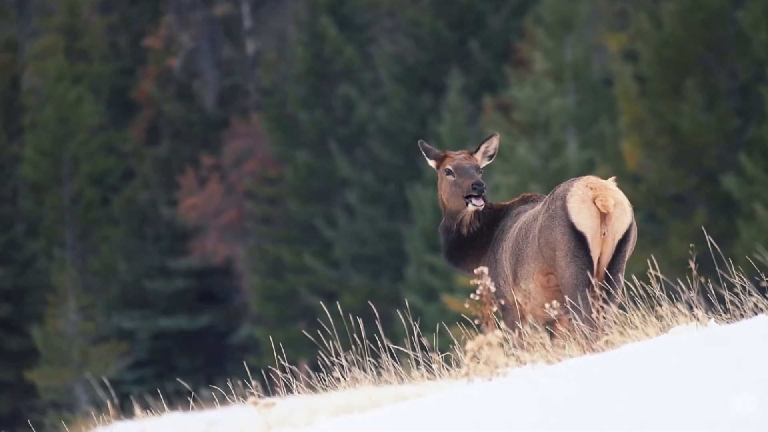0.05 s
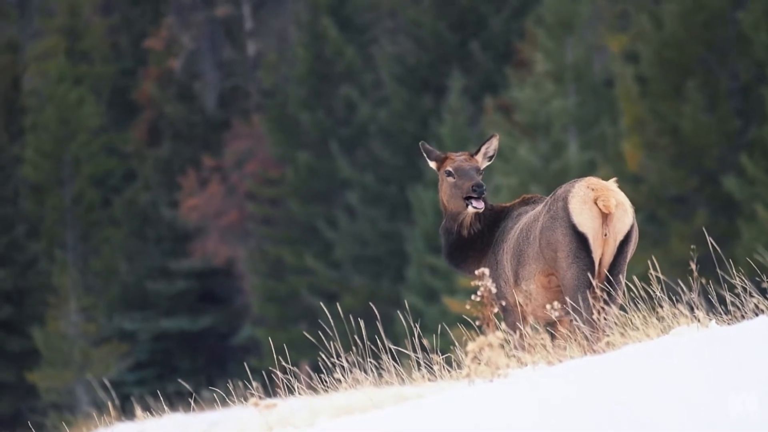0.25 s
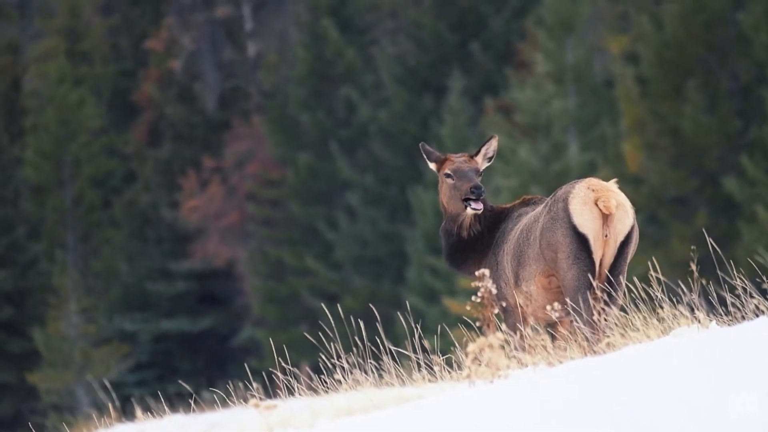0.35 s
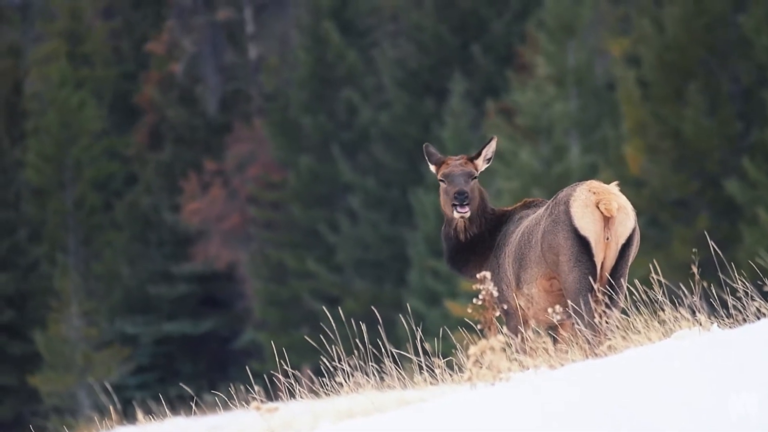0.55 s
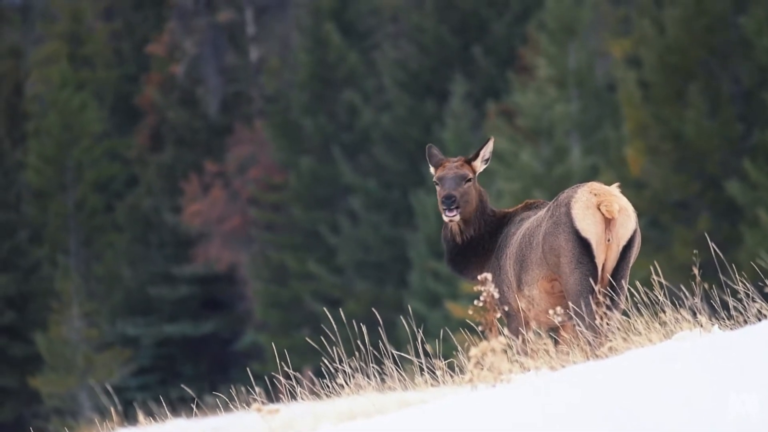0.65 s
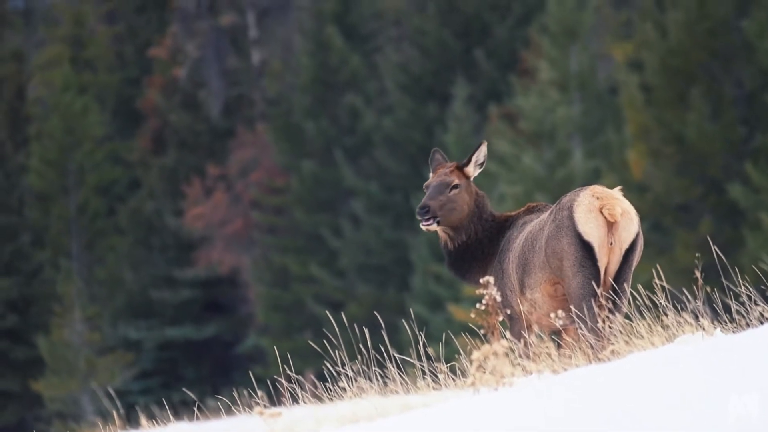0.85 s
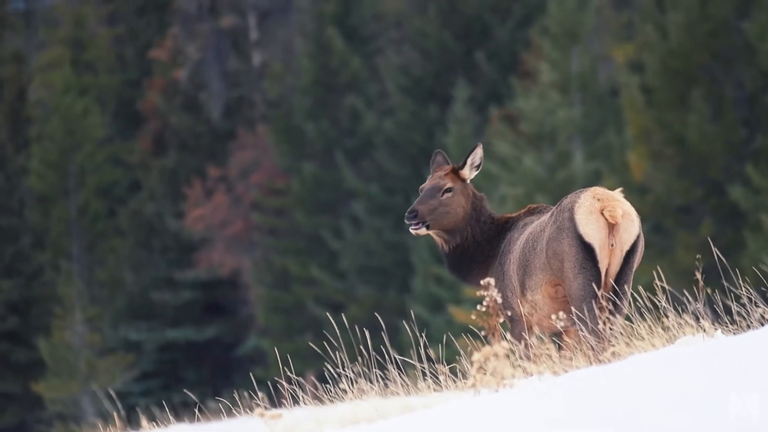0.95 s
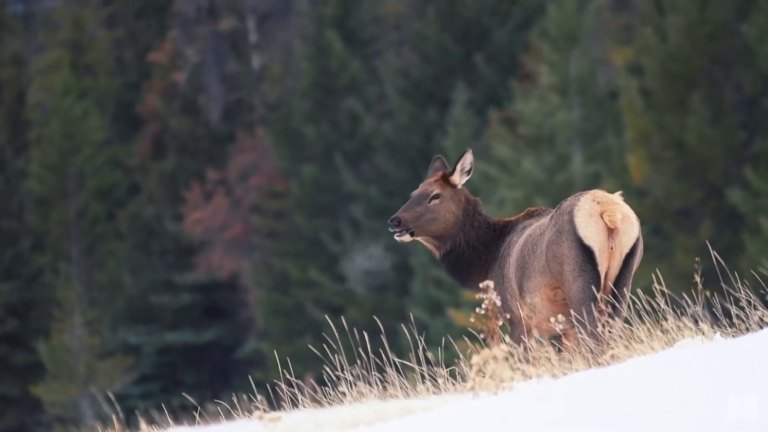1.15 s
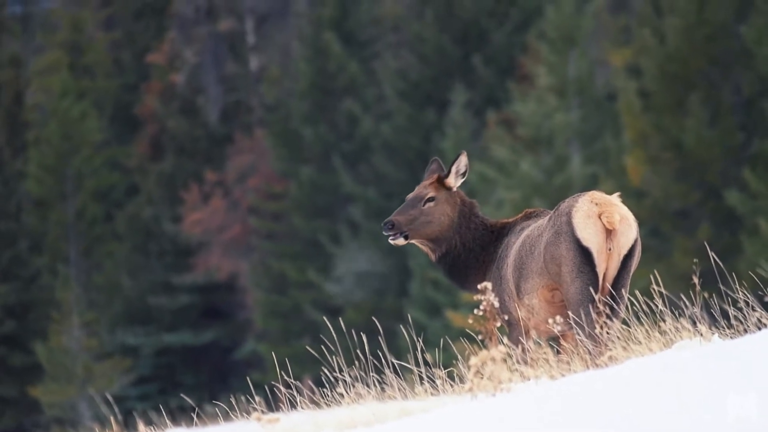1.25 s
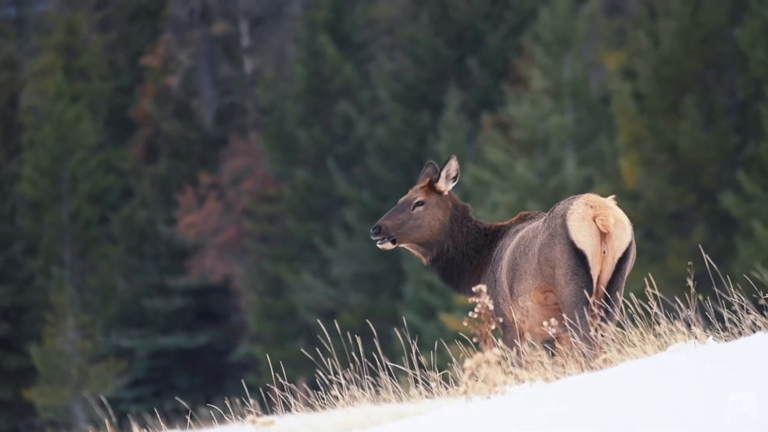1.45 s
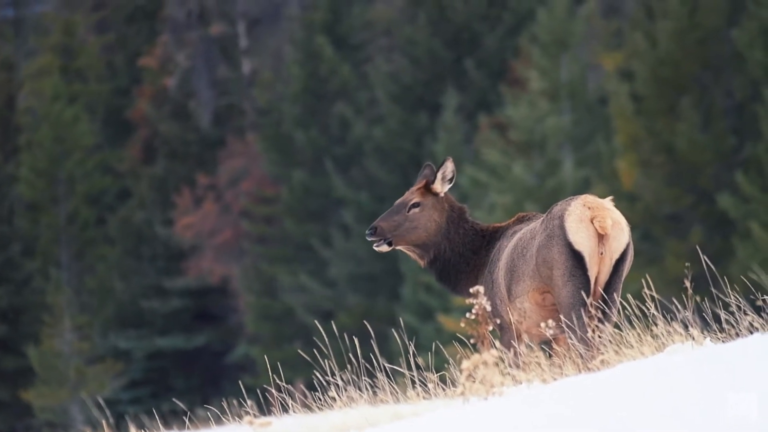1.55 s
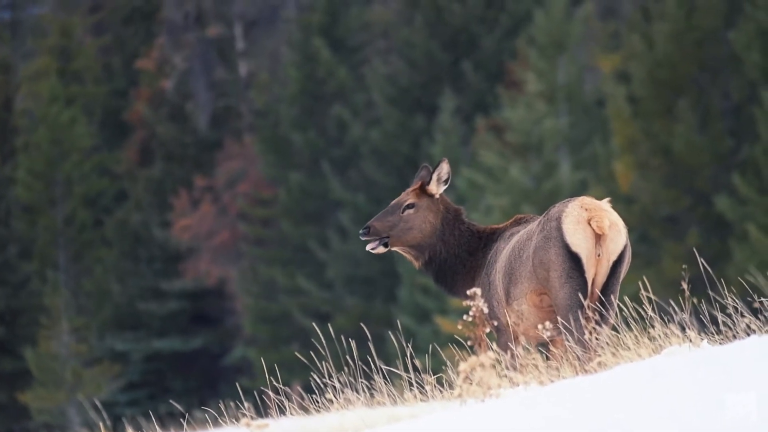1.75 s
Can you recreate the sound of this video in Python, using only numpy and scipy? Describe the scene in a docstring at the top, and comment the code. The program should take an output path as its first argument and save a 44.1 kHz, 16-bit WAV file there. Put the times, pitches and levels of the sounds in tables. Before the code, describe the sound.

An elk gives a high squealing mew that falls to a moan, over faint wind.

```python
"""A cow elk at the forest's edge

A cow elk mews on a snowy slope and starts a second call. Her vocal folds buzz and her throat
shapes the tone: it slides up through the nose into a clear squeal, falls, and opens into a low
moan. The trees return a faint echo; far wind rushes in them and rumbles at the microphone."""
import sys
import numpy as np
from scipy import signal
from scipy.fft import rfft, irfft
from scipy.io import wavfile

SR = 44100
rng = np.random.default_rng(int(sys.argv[2]) if len(sys.argv) > 2 else 0)


def file_out(sig):
    """Save sig as 16-bit WAV at sys.argv[1]."""
    # one column per channel
    cols = np.atleast_2d(sig).T
    # limit, then scale
    lim = np.clip(cols, -1, 1)
    pcm = np.round(lim * 32767).astype(np.int16)
    wavfile.write(sys.argv[1], SR, pcm)


N = 79380


def from_db(db):
    """Turn decibels into a number to multiply a sound by."""
    return 10 ** (np.asarray(db) / 20)


def unit_power(sound):
    """Scale a sound so that its average power is 1."""
    return sound / np.sqrt(np.mean(sound ** 2) + 1e-20)


def over_time(table):
    """Join a table's rows with straight lines: one curve for each column after the time."""
    times, *columns = np.transpose(table)
    return [np.interp(np.arange(N) / SR, times, column) for column in columns]


def share(table):
    """A curve over time, held between 0 and 1."""
    return np.clip(over_time(table)[0], 0, 1)


def at_hz(table, hz):
    """Read a table at any frequency, giving each octave equal room."""
    frequencies, values = np.transpose(table)
    return np.interp(np.log(np.maximum(hz, 1)), np.log(frequencies), values)


def bin_hz():
    """The frequencies that make up a sound N samples long."""
    return np.arange(N // 2 + 1) * SR / N


def noise(spectrum):
    """Noise with the balance of bass and treble that a table gives."""
    return irfft(rfft(rng.standard_normal(N)) * from_db(at_hz(spectrum, bin_hz())), N)


def drift(per_s):
    """A smooth random wobble of about size 1 that changes about `per_s` times a second."""
    return unit_power(irfft(rfft(rng.standard_normal(N)) / (1 + (bin_hz() / per_s) ** 2), N))


# How alike left and right are (1 is the same): frequency_hz, likeness
STEREO_LIKENESS = [(100, .9999), (300, .997), (700, 0.99), (2000, 0.48), (4500, 0.25), (8000, 0.15),
                   (13000, .05)]

def stereo_noise(spectrum):
    """Noise from all around at two close microphones: alike in the bass, unrelated in the treble."""
    alike = np.clip(at_hz(STEREO_LIKENESS, bin_hz()), 0, 1)
    common, difference = rfft(noise(spectrum)), rfft(noise(spectrum))
    spread = np.sqrt((1 - alike) / (1 + alike))
    return irfft(common + spread * difference * np.array([[1], [-1]]), N)


# The tone of wind in the trees, with its hiss: frequency_hz, level_db
TREE_WIND_TONE = [(110, -36), (180, -10), (262, -10.5), (320, -11.5), (420, -13.5), (490, -8), (570, -1),
                  (760, 0), (890, -2.5), (1220, -7), (1880, -18.5), (2360, -20), (2840, -23), (4500, -26.5),
                  (8610, -29), (15100, -31.5), (16000, -37.5)]

def wind_in_trees():
    """Far wind rushes almost steadily through the trees."""
    level_db = -52.5 + .15 * drift(per_s=2.36)
    return unit_power(stereo_noise(TREE_WIND_TONE)) * from_db(level_db)


# The tone of wind at the microphone: frequency_hz, level_db
RUMBLE_TONE = [(3, -38.5), (14, 3.5), (25, -2), (38, -0.5), (58, -7.5), (85, -3.5), (120, -15.5),
               (170, -14), (260, -26), (500, -57.5)]
# How strongly it blows there: time_s, level_db
BREEZE_LEVEL = [(0, -54.5), (.3, -52), (.6, -54.5), (.8, -50.5), (1.2, -53), (1.42, -56.5), (1.6, -56),
                (1.8, -51.5)]

def wind_at_microphone():
    """A breeze brushes the microphone and makes a soft, uneven rumble."""
    level_db = over_time(BREEZE_LEVEL)[0] + 1.2 * drift(per_s=5.1)
    return unit_power(noise(RUMBLE_TONE)) * from_db(level_db)


def resonance_db(resonances, hz):
    """A resonance favours sound near its own frequency; this adds up several of them."""
    power = sum(from_db(db) ** 2 / (1 + (2 * (hz - centre) / width) ** 2) ** 2
                for centre, width, db in resonances)
    return 10 * np.log10(power + 1e-14)


# Where the throat rings with the mouth nearly shut: centre_hz, width_hz, level_db
NASAL_RESONANCES = [(740, 194, 0.5), (1113, 124, 6), (1488, 79, 7.5), (1803, 175, 2), (2272, 188, 0),
                    (2960, 410, -7.5), (3883, 355, -8), (5060, 216, -13.5), (6140, 830, -21),
                    (7830, 1000, -26.5), (10200, 560, -34.5)]
# Where it rings in the moan: centre_hz, width_hz, level_db, jaw_down_centre_hz, jaw_down_level_db
MOAN_RESONANCES = [(972.5, 335, -1.5, 900, -5), (1535, 594, 1, 1616, 5), (2843, 165, -2.5, 2965, 10),
                   (3700, 890, -11.5, 4000, -16), (4225, 450, -22, 4170, -9.5),
                   (5050, 318, -2, 5160, -10.5), (6440, 590, -16, 6180, -22), (8400, 910, -15, 7830, -27.5),
                   (10300, 1100, -21, 10000, -35)]
# The mouth opens for the moan and shuts after it: time_s, open_share
MOUTH_OPENING = [(.735, 0), (.785, 1), (1.3, 1), (1.5, 0)]
# The jaw drops during the moan: time_s, dropped_share
JAW_DROP = [(.85, 0.11), (1.0, 0.98)]

def throat_db(hz, sounding):
    """The throat shapes the voice: nasal at first, then a moan as the mouth opens."""
    mouth, jaw = share(MOUTH_OPENING)[sounding], share(JAW_DROP)[sounding]
    moan = [(centre + (down_hz - centre) * jaw, width, db + (down_db - db) * jaw)
            for centre, width, db, down_hz, down_db in MOAN_RESONANCES]
    return (1 - mouth) * resonance_db(NASAL_RESONANCES, hz) + mouth * resonance_db(moan, hz)


# The squeal's harmonics from the first up (the last row serves all higher ones): round_db, shrill_db
SQUEAL_HARMONICS = [(1, 0.5), (-3.0, -18), (-14.5, -12.5), (-20.5, -15.5), (-34.5, -32.5), (-56, -36.0),
                    (-41.5, -67.5), (-65, -65)]
# Strain in the squeal (0 is round, 1 is shrill): time_s, strain_share
SQUEAL_STRAIN = [(0.22, -0.15), (0.27, 0.13), (0.33, 0.96), (0.36, 0.69), (0.398, -0.048), (0.458, 0.15)]

def squeal_db(harmonic, sounding):
    """Strain moves each harmonic of the squeal from its round level to its shrill one."""
    round_db, shrill_db = SQUEAL_HARMONICS[min(harmonic, len(SQUEAL_HARMONICS)) - 1]
    return round_db + (shrill_db - round_db) * share(SQUEAL_STRAIN)[sounding]


# How fast the vocal folds vibrate, one list per call: time_s, pitch_hz
CALL_PITCHES = [
    [(.09, 718), (.118, 731), (.135, 844), (.15, 990), (.156, 1000), (.161, 1250), (.175, 1266),
     (.187, 1404), (.21, 1434), (.26, 1452), (.325, 1437), (.36, 1448), (.39, 1473), (.452, 1473),
     (.459, 1447), (.464, 1377), (.505, 1294), (.52, 1192), (.548, 1121), (.57, 1030), (.59, 979),
     (.605, 858.7), (.625, 774), (.648, 720), (.656, 602), (.675, 545.3), (.69, 475.3), (.72, 415.6),
     (.755, 366.7), (.78, 360.8), (.85, 356.7), (.95, 336.4), (1.06, 327.2), (1.11, 301.2), (1.165, 244.5)],
    [(1.72, 641), (1.75, 731.5), (1.77, 894), (1.8, 1117), (1.82, 1270)],
]
# The force of the voice before shaping, one list per call: time_s, level_db, brightness_db_per_octave
CALL_EFFORTS = [
    [(.09, -66, 0), (.115, -52.5, 1.1), (.14, -55.5, 1.5), (.175, -44.5, 0.9), (.2, -46, 0.5),
     (.24, -33.5, 0.14), (.3, -30, 2.26), (.35, -30, 2.2), (.42, -28.5, -0.65), (.455, -32, -0.5),
     (.48, -26, -1), (.51, -40.5, 0.9), (.535, -39.5, 2.3), (.56, -54.5, 2.7), (.588, -48, 5),
     (.6, -37, -1), (.615, -53, 6.5), (.645, -42, -5.5), (.68, -55, 6.5), (.71, -62.5, 8.5),
     (.74, -51.5, 2), (.76, -50.5, -0.7), (.84, -44.5, -0.3), (.92, -47.5, 1), (1.0, -47.5, 2.8),
     (1.06, -48, 3.3), (1.11, -56, 2), (1.14, -51.5, -3.5), (1.165, -70, -17)],
    [(1.725, -47.5, -7), (1.75, -47.5, 0.5), (1.77, -64, 8.5), (1.785, -56.5, 0), (1.8, -54, -21)],
]
# The voice breaks into the squeal and out of it: time_s, squeal_share
SQUEAL_AMOUNT = [(.185, 0), (.215, 0.98), (.452, 0.95), (.47, 0.11)]
# Where the voice sits between the ears: frequency_hz, left_minus_right_db
VOICE_BALANCE = [(700, -1.5), (1150, -1.5), (1450, -2.45), (1800, 3), (2900, -0.3), (4400, 0.9), (9000, 1)]

def elk_call(pitch, effort):
    """Vibrating vocal folds make harmonics: tones at 1, 2, 3... times the pitch."""
    pitch_wobble_share, level_wobble_db, rasp_db = .00083, .5, -40
    low_hz, bright_from_hz, top_hz = 510, 1400, 13500
    fade_s, right_leads_s = .006, .00001
    thin_start_db, thin_start_s = -23, .06
    start, end = pitch[0][0], pitch[-1][0]
    t = np.arange(N) / SR
    sounding = (t > start) & (t < end)
    t = t[sounding]
    pitch_hz = (over_time(pitch)[0] * (1 + pitch_wobble_share * drift(per_s=156)))[sounding]
    level_db, brightness = (curve[sounding] for curve in over_time(effort))
    level_db = level_db + level_wobble_db * drift(per_s=20)[sounding]
    squeal = share(SQUEAL_AMOUNT)[sounding]
    cycles = np.cumsum(pitch_hz) / SR + np.array([[0], [right_leads_s]]) * pitch_hz
    fade = np.clip(np.minimum(t - start, end - t) / fade_s, 0, 1)
    air = from_db(rasp_db) * (drift(per_s=920) + 1j * drift(per_s=920))
    call = np.zeros((2, N))
    for harmonic in range(1, 37):
        hz = harmonic * pitch_hz
        tone_db = (1 - squeal) * throat_db(hz, sounding) + squeal * squeal_db(harmonic, sounding)
        if harmonic == 1:  # each call starts with its lowest tone weak
            tone_db += thin_start_db * np.clip(1 - (t - start) / thin_start_s, 0, 1)
        treble_db = brightness * np.log2(np.maximum(hz / bright_from_hz, 1))
        balance_db = at_hz(VOICE_BALANCE, hz) * np.array([[.5], [-.5]])
        gain = from_db(level_db + tone_db + treble_db + balance_db)
        gain /= 1 + (low_hz / hz) ** 4  # her small mouth gives out little bass
        gain /= 1 + (hz / top_hz) ** 20
        rasp = 1 + np.roll(air, rng.integers(N))[sounding]  # air noise around the harmonic
        phase = 2 * np.pi * harmonic * cycles - .12 * harmonic ** 2  # the throat smears each pulse
        wave = np.imag(rasp * np.exp(1j * phase))
        call[:, sounding] += np.sqrt(2) * fade * gain * wave
    return call


# The tone of the forest's echo: frequency_hz, level_db
ECHO_TONE = [(500, -13), (1450, -20.5), (2200, -15), (3000, -20), (4200, -33), (6000, -33), (12000, -40)]
# She turns her head from us towards the trees: time_s, sent_to_forest_db
TURN_TO_TREES = [(.45, -13.5), (.6, -9.5), (.9, 3)]

def forest_echo(voice):
    """Countless trunks scatter the call back: a dull echo that builds up and dies away."""
    build_s, fall_60_db_s = .12, 1.7
    t = np.arange(N) / SR
    swell = (1 - np.exp(-t / build_s)) * from_db(-60 * t / fall_60_db_s)
    reflections = stereo_noise(ECHO_TONE) * swell / np.sqrt(np.sum(swell ** 2))
    sent = voice.mean(axis=0)[None] * from_db(over_time(TURN_TO_TREES)[0])
    return signal.fftconvolve(sent, reflections, axes=1)[:, :N]


# How loud her breath is: time_s, level_db
BREATH_LEVEL = [(.15, -99), (.21, -62), (.35, -69), (.45, -56.5), (.55, -56), (.64, -65), (1.16, -87),
                (1.195, -58), (1.3, -67), (1.4, -64), (1.52, -83)]
# The tone of her breath: frequency_hz, level_db
BREATH_TONE = [(900, -10), (1550, 2.5), (2200, 3), (2900, -7.5), (4000, -9.5), (6500, -39)]

def breath():
    """Air hisses through her mouth in the squeal and puffs out after the moan."""
    return from_db(over_time(BREATH_LEVEL)[0]) * unit_power(noise(BREATH_TONE))


def within(x, low, high, edge):
    """1 between two limits and 0 outside, with sloping edges."""
    return np.clip(np.minimum(x - low, high - x) / edge + .5, 0, 1)


# Moments when the middle treble goes dull: start_s, end_s, low_hz, high_hz, change_db
DULL_MOMENTS = [(0.597, 0.77, 3090, 4985, -58), (0.635, 0.736, 1900, 3200, -25),
                (1.16, 1.167, 2848, 5298, -8)]

def treble_dips(sound):
    """A band of the treble sinks for a moment and comes back."""
    edge_s, edge_hz = .03, 250
    hz, times, slices = signal.stft(sound, SR, nperseg=512, noverlap=384)
    dip_db = sum(db * np.outer(within(hz, low, high, edge_hz), within(times, start, end, edge_s))
                 for start, end, low, high, db in DULL_MOMENTS)
    return signal.istft(slices * from_db(dip_db), SR, nperseg=512, noverlap=384)[1][:, :N]


def scene():
    """The calls and the breath, their echo, and the wind, all added together."""
    calls = sum(elk_call(pitch, effort) for pitch, effort in zip(CALL_PITCHES, CALL_EFFORTS))
    voice = calls + breath()
    return voice + forest_echo(voice) + wind_in_trees() + wind_at_microphone()


def record(dry):
    """The treble dips briefly, and the very highest sounds are cut off."""
    cutoff_hz = 15800
    top_cut = signal.ellip(12, .1, 90, cutoff_hz, fs=SR, output="sos")
    return signal.sosfilt(top_cut, treble_dips(dry))


dry = scene()
out = record(dry)
file_out(out)
```